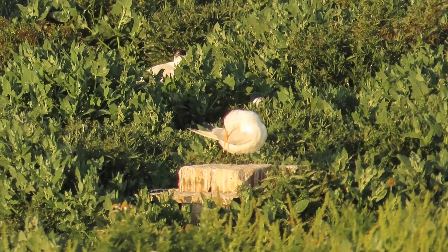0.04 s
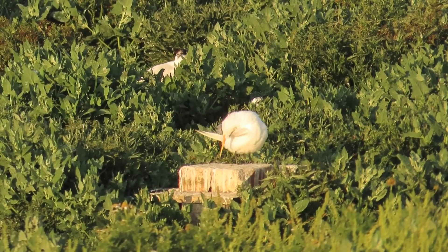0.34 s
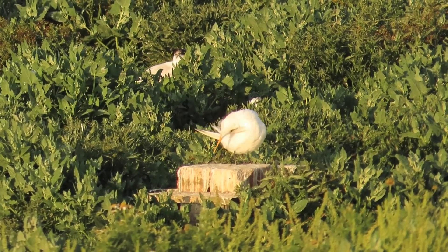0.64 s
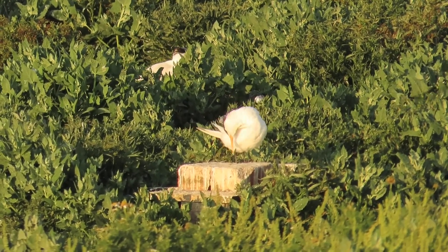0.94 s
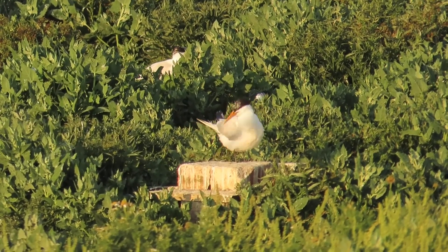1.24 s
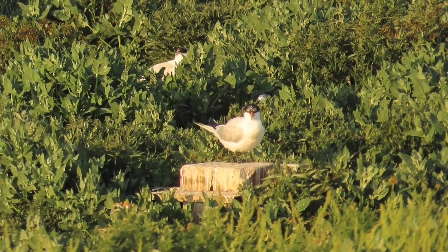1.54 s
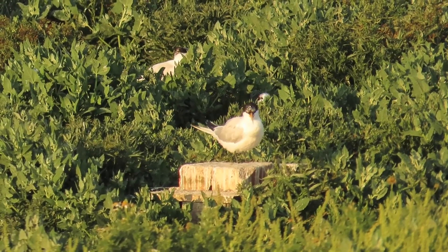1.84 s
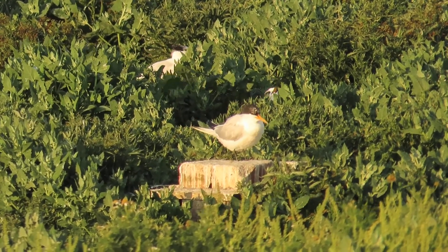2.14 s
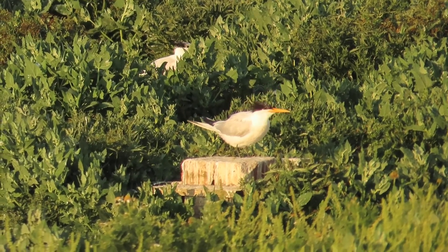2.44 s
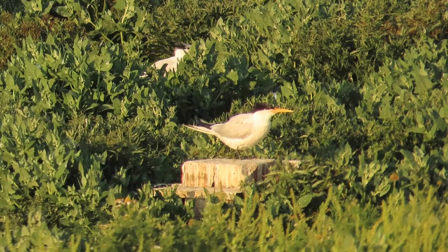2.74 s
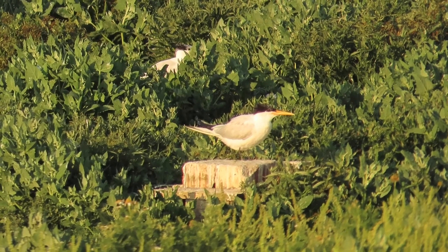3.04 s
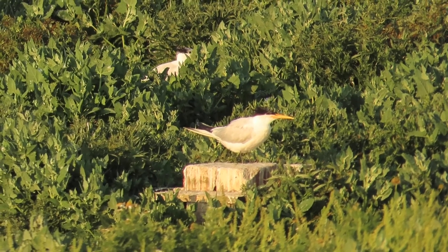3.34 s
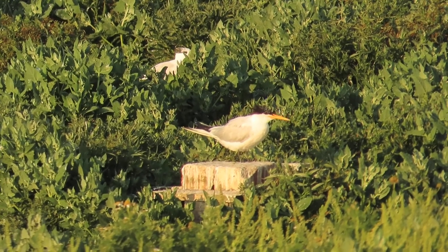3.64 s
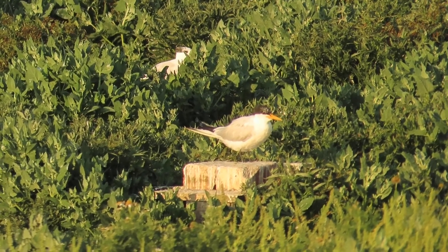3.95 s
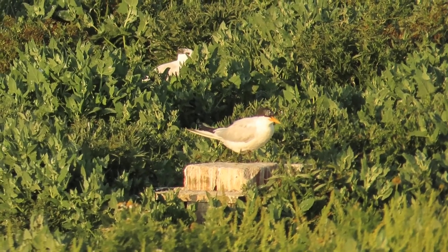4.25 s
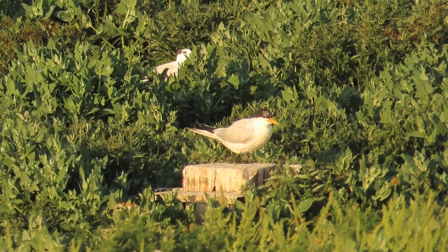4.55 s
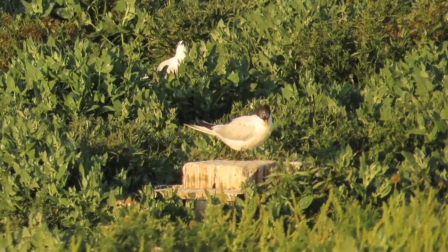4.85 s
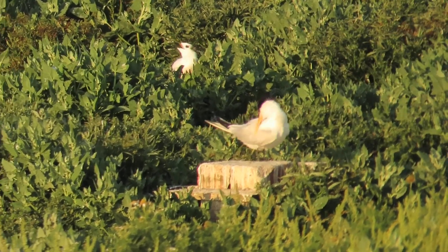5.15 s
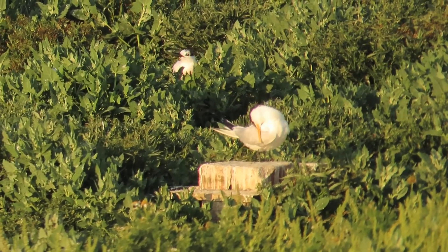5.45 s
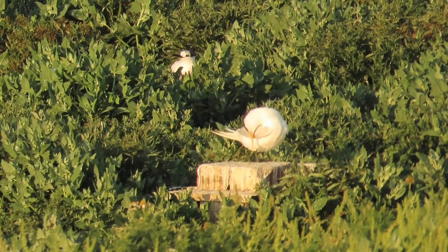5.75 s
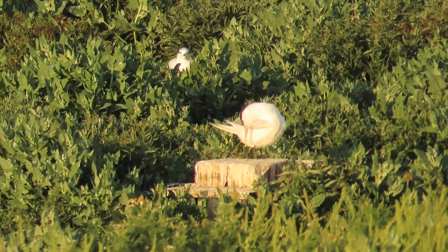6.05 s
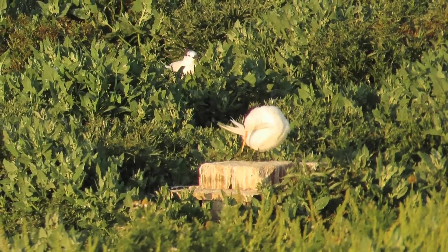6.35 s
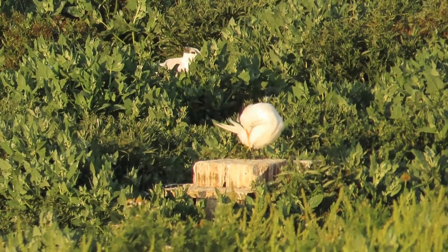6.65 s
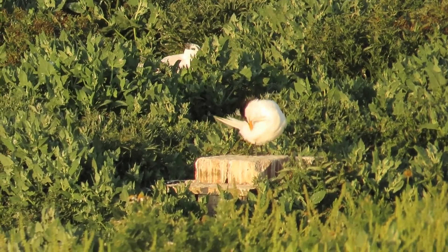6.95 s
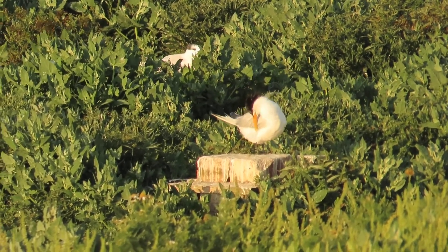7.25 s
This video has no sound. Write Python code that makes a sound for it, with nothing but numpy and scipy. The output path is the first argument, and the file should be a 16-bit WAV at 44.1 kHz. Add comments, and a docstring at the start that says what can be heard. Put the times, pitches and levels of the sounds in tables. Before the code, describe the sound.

Hundreds of seabirds call over one another in the open air, making a dense, high chatter that swells and sinks slightly. Rasping screeches, bending whistles and squeaky chips from closer terns poke through all along, joined from about halfway by several stronger, rattling cries. Light wind buffets the microphone at times with a low rumble, and there are a few faint knocks and ticks, mostly near the end.

```python
"""Tern colony on a breezy evening

Terns clamour in low shrubs. Each call is a whistle that bends in pitch and rasps when chopped into
quick pulses. Near birds stand out with grating "keer" calls, wavering wails, screeches and chips;
hundreds more overlap behind them and melt into a far wash of noise. Gusts rumble on the microphone,
and a few faint knocks and ticks sound close by."""
import sys
import numpy as np
from scipy import signal
from scipy.fft import rfft, irfft, next_fast_len
from scipy.io import wavfile
from scipy.ndimage import map_coordinates

SR = 44100
rng = np.random.default_rng(int(sys.argv[2]) if len(sys.argv) > 2 else 0)


def wav_out(sig):
    """Save sig, one row per channel (or a flat mono array), as 16-bit PCM at SR to the path in sys.argv[1]."""
    wavfile.write(sys.argv[1], SR, np.round(np.clip(np.atleast_2d(sig).T, -1, 1) * 32767).astype(np.int16))


N = 326781
TIME = np.arange(N) / SR

# "keer" calls: start of the clear hold/s, hold/s, f/Hz, level/dB, rattle before/s, rattle after/s
KEER_CALLS = [(3.999, 0.11, 2160, -21, .036, 0.028), (5.05, .12, 2143, -20, .064, 0.074),
              (6.112, 0.075, 2226, -18.5, 0.045, .013), (7.336, .15, 2203, -17, 0.071, .03)]
# thin wails: t/s, length/s, level/dB, rasp (0 clear, 1 harsh), then f/Hz at five even steps
WAIL_NOTES = [(.34, .17, -37, .15, 5570, 5610, 5640, 5680, 5650),
              (.525, 0.11, -25, .2, 3600, 3440, 3350, 3210, 2850),
              (.545, 0.089, -31, .3, 4650, 4920, 5080, 5050, 4850),
              (.775, .06, -30, .3, 5500, 5350, 5200, 5100, 5080),
              (.845, 0.099, -29.5, .1, 5150, 5380, 5260, 5380, 5200),
              (.905, 0.095, -20.5, .05, 2250, 2230, 2430, 2490, 2300),
              (1.13, .12, -27.5, .3, 2400, 2475, 2560, 2640, 2600),
              (1.595, .055, -23, .15, 2980, 2995, 2890, 2640, 2500),
              (1.655, .125, -26, .25, 2600, 2770, 2980, 3070, 2950),
              (1.69, .09, -38, .2, 5550, 5750, 5880, 5900, 5830),
              (1.96, 0.15, -21, 0.33, 2380, 2360, 2260, 2270, 2320),
              (2.13, .11, -20.5, .1, 2265, 2273, 2400, 2440, 2300),
              (2.34, 0.085, -24, 0.22, 2180, 2400, 2650, 2790, 2780),
              (2.55, .095, -26.5, .15, 2620, 2800, 2950, 3040, 2870),
              (2.74, .14, -32, .3, 2187, 2335, 2480, 2520, 2430),
              (2.765, .065, -40, .1, 5700, 5780, 5750, 5600, 5380),
              (2.875, 0.1, -32.5, 0.6, 5430, 5650, 5550, 5400, 5130),
              (2.985, 0.12, -31.5, .05, 5220, 5430, 5430, 5730, 5400),
              (3.385, .085, -36, .2, 5250, 5280, 5150, 5080, 4950),
              (3.54, .11, -27.5, .2, 2153, 2195, 2280, 2370, 2400),
              (3.92, .11, -26, 0.27, 2294, 2490, 2700, 2590, 2380),
              (4.195, .11, -28.5, .2, 2120, 2310, 2440, 2330, 2130),
              (4.595, .08, -25.5, .2, 2150, 2346, 2550, 2690, 2750),
              (5.3, 0.15, -28.5, 0.27, 2284, 2465, 2700, 2930, 3050),
              (5.49, 0.07, -35, .2, 4200, 4440, 4600, 4620, 4400),
              (5.52, .12, -32, .2, 3300, 3320, 3300, 3270, 3120),
              (5.53, .1, -25.5, .25, 2346, 2200, 2250, 2340, 2350),
              (5.59, .1, -35, .3, 4190, 4500, 4600, 4450, 4600),
              (5.7, .125, -38, .15, 5300, 5280, 5560, 5460, 5250),
              (6.2, 0.19, -26, .35, 2260, 2440, 2650, 2730, 2680),
              (6.68, 0.098, -22.5, 0.22, 2220, 2300, 2430, 2470, 2400)]
# drawn-out notes on one pitch: t/s, length/s, f/Hz, level/dB, rasp/0-1
SCREECH_NOTES = [(0.299, 0.07, 2950, -28, 1), (0.318, 0.21, 3670, -31, 0.7),
                 (0.473, .15, 2303, -24.5, 0.82), (.629, 0.13, 4930, -37, 0.66),
                 (1.006, 0.078, 5000, -31, .8), (1.19, 0.15, 4350, -30.5, .86),
                 (1.552, 0.17, 1836, -34, .98), (1.867, .15, 4650, -31.5, 0.95),
                 (2.13, 0.18, 1348, -33.5, 1), (2.186, 0.089, 3950, -28, 1), (2.196, 0.13, 6800, -40.5, 1),
                 (2.869, 0.15, 4250, -33, .9), (3.085, 0.16, 2133, -28, 0.6), (3.16, 0.11, 2500, -27, 0.77),
                 (3.243, 0.14, 4700, -33, .9), (3.452, .09, 4080, -31, 1), (4.38, .07, 6620, -41, .4),
                 (4.598, 0.13, 6970, -44, 0.9), (4.917, .08, 4360, -30, 0.95),
                 (5.157, 0.058, 4300, -25, .8), (6.442, .06, 4900, -30, 1), (6.455, .059, 2240, -23, .1),
                 (6.473, .15, 7150, -45, 1), (6.574, 0.042, 2250, -26, .7), (6.635, .15, 3870, -34, .9),
                 (6.793, 0.09, 2365, -25.5, 0.4), (7.15, .17, 2550, -27, .9), (2.02, 0.12, 2510, -27, 1),
                 (4.117, .09, 2053, -27, 0.64), (4.451, 0.093, 2344, -24.5, 0.74),
                 (4.859, .07, 2255, -27, .5), (6.084, .11, 2024, -30, 0.94), (7.185, .08, 5970, -40, 1)]
# notes that slide up: t/s, length/s, middle f/Hz, level/dB, rasp/0-1
RISING_NOTES = [(.767, 0.068, 2270, -25.5, .15), (2.98, 0.041, 2315, -26, 0.2),
                (3.0, .06, 2685, -25.5, 0.5), (3.68, 0.058, 2800, -24, .3), (4.39, .054, 2250, -23.5, 0.1),
                (6.34, 0.055, 3030, -25.5, .2), (6.618, 0.035, 2280, -22, 0.2)]
# notes that slide down: t/s, length/s, middle f/Hz, level/dB, rasp/0-1
FALLING_NOTES = [(0, 0.084, 2540, -24.5, 0), (2, .05, 5500, -33, .1), (1, 0.047, 3000, -27, 0.3),
                 (3, 0.046, 3300, -28, .1), (6, 0.046, 3200, -25.5, .2)]
# short arched chips: t/s, length/s, top f/Hz, level/dB, overtone boost/dB, rasp/0-1, droop/octaves
CHIP_NOTES = [(.848, .048, 5980, -34.5, 3, 0, .08), (0.952, .033, 3290, -28, -10, .2, .08),
              (.955, .045, 4970, -24, -17, .05, 0.049), (1.791, .055, 3920, -37, 20, .3, 0.065),
              (1.817, 0.063, 2610, -26, 16, .5, 0.07), (2.182, 0.057, 4900, -28, -5, .1, .04),
              (2.408, 0.033, 3220, -24.5, 13, .2, 0.072), (3.825, .057, 2950, -31.5, 16, .2, 0.042),
              (4.092, .08, 2920, -29, 6, .3, .1), (4.43, 0.035, 2985, -23, 16, .1, 0.053),
              (4.441, 0.042, 4850, -27, 0, .05, 0.099), (4.516, 0.074, 2896, -19.5, 9, 0.06, 0.03),
              (4.68, 0.044, 4400, -26.5, 1, .6, .08), (5.981, 0.027, 5380, -29.5, -2, .2, 0.056),
              (6.293, 0.065, 4580, -30.5, 10, .3, 0.078), (6.507, 0.06, 2443, -23.5, 7, 0.5, 0.09),
              (6.927, .035, 5000, -31, -3, .1, .06), (7.156, .04, 5460, -30.5, 9, 0.5, .074)]
# kinds of voice in the crowd, with their typical values:
# rate/(calls per s), f/Hz, pitch spread/octaves, length/s, level/dB, rasp/0-1, harmonics 1-4/dB
CROWD_VOICES = [(31.936, 2440, .1, .09, -37, .42, 5.5, -9.5, -29, -49),
                (26.02, 3000, .14, .08, -36.5, 0.32, 3, -15, -22.5, -46),
                (29.98, 3300, .14, .1, -35.5, .7, 0.5, -11.5, -26, -48),
                (33.95, 1380, .08, .12, -37, 0.836, -5, -0.5, 0, -17),
                (29.9, 4050, .1, .08, -38.5, 0.62, 0, -16.5, -51, -60),
                (13.97, 5250, .062, .06, -42, 0.46, 3.5, -21, -60, -60)]
# shape of the colony's swells, softened in clamour(): t/s, throaty/dB, middle/dB, shrill/dB
COLONY_SWELLS = [(0.0, -32, -21, -31), (0.1, -31, -26.5, -29), (0.93, -34.5, -23, -30.5),
                 (1.36, -32, -24.5, -31), (1.67, -30.5, -22, -28), (1.79, -31.5, -27, -32),
                 (1.88, -29, -24.5, -29.5), (2.06, -40, -28.5, -35), (2.21, -33.5, -26.5, -28),
                 (2.31, -35, -23.5, -33), (2.42, -32, -25, -32), (2.52, -32, -30, -31.5),
                 (2.74, -32.5, -24.5, -33), (2.97, -33, -23.5, -30.5), (4.27, -33, -24, -33.5),
                 (4.52, -31, -22.5, -28), (4.7, -31, -22.5, -30.5), (4.77, -34, -29, -38.5),
                 (4.87, -31.5, -25.5, -33), (4.99, -29.5, -23.5, -30), (5.21, -34.5, -23.5, -28.5),
                 (5.28, -34.5, -29, -35), (5.4, -37, -25, -31.5), (5.7, -33, -25.5, -33.5),
                 (5.88, -38.5, -25, -39), (6.27, -29, -25.5, -29.5), (6.54, -37.5, -29, -33),
                 (6.65, -28.5, -23.5, -29), (6.89, -35.5, -24, -36.5), (7.05, -34, -28, -36),
                 (7.23, -27, -22.5, -31), (7.41, -31.5, -25, -30)]
# tone colour of the far birds: f/Hz, level/dB
WASH_SPECTRUM = [(530, -22.5), (900, -14.5), (1310, -9), (1850, -7.5), (2180, -1), (2340, -2.5), (3740, -4),
                 (4210, -9), (4680, -11.5), (5390, -10), (6200, -20), (6980, -17), (10200, -36.5),
                 (11200, -30.5), (15000, -45.5)]
# knocks and ticks: t/s, level/dB, centre f/Hz, width/octaves, time to fade by 60 dB/s
KNOCK_BURSTS = [(1.137, -31, 285, 0.35, 0.075), (1.2, -41, 296, 0.3, .12), (3.816, -33, 600, 2, 0.079),
                (6.324, -29.5, 11500, 0.76, 0.021), (6.648, -25.5, 870, 0.6, 0.065),
                (7.007, -30, 850, 0.94, 0.11)]
# strength of the wind on the microphone: t/s, level/dB
GUST_LEVELS = [(0.0, -70), (0.39, -45), (0.87, -51.5), (0.93, -36), (1.28, -55), (1.57, -35.5), (2.04, -34),
               (2.1, -27.5), (2.15, -32), (2.6, -47), (2.81, -32), (2.86, -23.5), (2.96, -28.5),
               (3.03, -20), (3.1, -38), (3.3, -44.5), (4.08, -51), (4.29, -33.5), (4.34, -36), (4.77, -40),
               (4.93, -34.5), (5.06, -46.5), (5.6, -41.5), (6.09, -33), (6.15, -27.5), (6.25, -38.5),
               (6.54, -38), (6.62, -30.5), (6.87, -37.5), (7.14, -23.5), (7.31, -54), (7.37, -30),
               (7.41, -53)]
# rumble shared by the microphone's two openings (ports): f/Hz, level/dB
RUMBLE_SPECTRUM = [(12, -42), (20, -17), (43, 1), (92, -0.5), (167, -12.5), (246, -24.5), (330, -28),
                   (430, -69), (730, -120)]
# small swirls of wind that differ between the ports: f/Hz, level/dB
EDDY_SPECTRUM = [(12, -45), (20, -13), (38, -6), (114, -2), (155, -3), (420, -24), (506, -26), (600, -29),
                 (780, -62), (1320, -120)]
# open-air background: f/Hz, level/dB
AIR_SPECTRUM = [(15, -44), (25, -18), (70, -42), (157, -5.5), (425, -3.5), (498, -0.5), (575, -12.5),
                (1100, -7.5), (1430, -63), (2420, -120)]
# how alike left and right are in the wash and the air: f/Hz, likeness/0-1
STEREO_LIKENESS = [(150, .99), (300, 0.85), (600, 0.94), (1400, 1), (3000, 0.93), (6000, 1), (9000, 0.96),
                   (12000, 1)]

RASP_HZ = 92.26   # typical pulse rate of a rasping voice
PORT_LAG_S, CUTOFF_HZ = 2.7e-5, 15300   # the microphone's left-side delay and treble limit


def tern(length, pitches, harmonics_db, rasp, jitter, rasp_jitter, rasp_sweep, waver=0):
    """One note: a whistle on a bending pitch, chopped into a rattle of pulses when it rasps."""
    size = max(int(length * SR), 200)
    progress, rasp = np.linspace(0, 1, size), np.clip(rasp, 0, 1)
    pulse_hz = RASP_HZ * np.exp(0.0934 * rng.normal() + 0.053 * wander(41, size))
    pulse_phase = 2 * np.pi * (np.cumsum(pulse_hz) / SR + rng.random())
    curve = np.polyfit(np.linspace(0, 1, len(pitches)), pitches, len(pitches) - 1)
    # a harsh voice is less steady, and its pitch sweeps within each pulse
    shake = (jitter + rasp_jitter * rasp ** 2) * wander(696, size)
    sweep = rasp_sweep * rasp ** 2 * np.sin(pulse_phase)
    hz = np.polyval(curve, progress) * (1 + shake + sweep) * (1 + waver * wander(110.6, size))
    phase = 2 * np.pi * np.cumsum(hz) / SR
    tone = sum(from_db(db) * np.sin(k * phase)
               for k, db in enumerate(harmonics_db, 1) if k * pitches[1] < CUTOFF_HZ)
    pulses = rms_one(1 - rasp + 2 * rasp * (.5 + .5 * np.cos(pulse_phase)) ** 2)
    swell = np.abs(np.sin(np.pi * progress)) ** .4
    flutter = rms_one(from_db((2 + 4 * rasp) * wander(88.6, size)))
    return np.sqrt(2) * tone * pulses * swell * flutter


def overtones(pitch, rasp, bright_db=0):
    """Levels of harmonics 1-4: the upper three are weak in a shrill voice, stronger in a harsh one."""
    second_db = -18.5 + bright_db - 14.5 * np.log2(pitch / 2190) + 3 * rasp
    return [0, second_db, second_db - 8, second_db - 27]


def near_note(length, pitch, rasp, octaves_per_s=0, droop=0, bright_db=0):
    """A near bird's note: the pitch slides steadily and sags by `droop` octaves at both ends."""
    slide = octaves_per_s * length / 2
    pitches = pitch * 2 ** np.array([-slide - droop, 0, slide - droop])
    return tern(length, pitches, overtones(pitch, rasp, bright_db), rasp,
                jitter=.0018, rasp_jitter=0.018, rasp_sweep=0.026)


def keers(rattle_octaves=-0.11, rattle_db=-8.5, octaves_per_s=0.69):
    """A grating call: a low rattle climbs into a clear held note, then breaks into a sinking rattle."""
    out = np.zeros((2, N))
    for start, hold, pitch, db, lead, tail in KEER_CALLS:
        low = pitch * 2 ** rattle_octaves
        rise = from_db(rattle_db) * near_note(lead, low, rasp=1, octaves_per_s=octaves_per_s)
        held = near_note(hold, pitch, rasp=0.16, droop=0.032)
        fall = from_db(rattle_db) * near_note(tail, low, rasp=1, octaves_per_s=-octaves_per_s)
        add(out, start - lead, from_db(db) * placed(np.concatenate([rise, held, fall])))
    return out


def wails(fade_db=3.5):
    """Thin notes whose pitch bends up and down, wavering and fading as they go."""
    out = np.zeros((2, N))
    for start, length, db, rasp, *pitches in WAIL_NOTES:
        note = tern(length, pitches, overtones(np.mean(pitches), rasp), rasp,
                    jitter=0.0045, rasp_jitter=0.026, rasp_sweep=.04, waver=0.0093)
        fade = from_db(fade_db * np.linspace(.5, -.5, len(note)))
        add(out, start, from_db(db) * placed(note * fade))
    return out


def near_birds():
    """The keers, wails, screeches, sliding notes and chips that stand out of the crowd."""
    out = keers() + wails()
    for start, length, pitch, db, rasp in SCREECH_NOTES:
        add(out, start, from_db(db) * placed(near_note(length, pitch, rasp, droop=0.0273)))
    for notes, octaves_per_s in (RISING_NOTES, 2.24), (FALLING_NOTES, -1.51):
        for start, length, pitch, db, rasp in notes:
            note = near_note(length, pitch, rasp, octaves_per_s, droop=0.036)
            add(out, start, from_db(db) * placed(note))
    for start, length, pitch, db, bright_db, rasp, droop in CHIP_NOTES:
        note = near_note(length, pitch, rasp, droop=droop, bright_db=bright_db)
        add(out, start, from_db(db) * placed(note))
    return out


def squeaks(per_s=12, pitch_hz=5400, spread_octaves=0.11, length=0.0493, db=-41):
    """Thin arched squeaks from birds further off run together into a twitter."""
    out, count = np.zeros((2, N)), int(per_s * N / SR)
    for k, (late, high, long, slope, close) in enumerate(rng.uniform(-1, 1, (count, 5))):
        pitch = pitch_hz * 2 ** (spread_octaves * high)
        note = near_note(length * 2 ** (long / 2), pitch, rasp=0.41, octaves_per_s=slope, droop=0.0835)
        add(out, (k + late) / per_s, from_db(db + 0.5 * close) * placed(note))
    return out


def crowd(distance_db=1.5, glide=.06, arch=.06):
    """Birds further off call at random, each with its own pitch, slope and distance."""
    out = np.zeros((2, N))
    for per_s, pitch, spread, length, db, rasp, *harmonics_db in CROWD_VOICES:
        count = int(per_s * N / SR)
        starts = (np.arange(count) + rng.uniform(-.7, .7, count)) / per_s
        traits = np.clip(rng.standard_normal((count, 6)), -2, 1.6)
        for start, (high, slope, bend, long, close, harsh) in zip(starts, traits):
            # most notes rise to a crest and drop again
            shape = np.array([1 - arch - glide * slope, 1, 1 - arch * (1 + .5 * bend) + glide * slope])
            pitches = pitch * 2 ** (spread * high) * shape
            note = tern(length * np.exp(.25 * long), pitches, harmonics_db, rasp + 0.17 * harsh,
                        jitter=.002, rasp_jitter=0.0267, rasp_sweep=0.033)
            add(out, start, from_db(db + distance_db * close) * placed(note))
    return out


def placed(sound, spread_db=0.5, lag_spread_s=1.4e-5):
    """A bird's place left or right: one side is by chance a little louder, and one a little earlier."""
    size = next_fast_len(sound.shape[-1])
    hz, sides = np.arange(size // 2 + 1) * SR / size, np.array([[.5], [-.5]])
    louder, earlier = rng.standard_normal(2)
    balance = from_db(spread_db * louder * sides)
    time_shift = np.exp(2j * np.pi * hz * lag_spread_s * earlier * sides)
    return irfft(rfft(sound, size) * balance * time_shift, size)


def shrubs(calls, fade_s, echo_db):
    """Leaves and ground scatter a short, blurred echo behind every call."""
    t = np.arange(SR // 2) / SR
    shared, own = rng.standard_normal(len(t)), rng.standard_normal((2, len(t)))
    tail = (shared + 0.21 * own) * from_db(-60 * t / fade_s) * (t > .003)
    tail /= np.sqrt(np.sum(tail ** 2, axis=1, keepdims=True))
    return calls + from_db(echo_db) * signal.fftconvolve(calls, tail, axes=1)[:, :N]


def clamour(colony, throaty_hz=1950, shrill_hz=4400, depth=0.63, chance_db=.5):
    """The colony swells and sinks; its throaty, middle and shrill voices each in their own way."""
    throaty, below_shrill = [signal.sosfiltfilt(signal.butter(3, hz, fs=SR, output="sos"), colony)
                             for hz in (throaty_hz, shrill_hz)]
    bands = throaty, below_shrill - throaty, colony - below_shrill
    return sum(band * from_db(depth * (db - db.mean()) + chance_db * wander(9, N))
               for band, db in zip(bands, in_time(COLONY_SWELLS)))


def knocks():
    """Each knock or tick is a short burst of noise that dies away in its own range of pitch."""
    out, t = np.zeros(N), np.arange(SR // 4) / SR
    for start, db, hz, octaves, fade_s in KNOCK_BURSTS:
        edges = np.minimum([hz * 2 ** (-octaves / 2), hz * 2 ** (octaves / 2)], SR / 2 - 1)
        band = signal.butter(2, edges, "band", fs=SR, output="sos")
        burst = rms_one(signal.sosfilt(band, rng.standard_normal(len(t))))
        add(out, start, from_db(db - 60 * t / fade_s) * burst)
    return out


def wind(buffet_db=4, eddy_db=-6, eddy_growth=0.76):
    """Gusts press on both ports alike; hard ones also shed small swirls that differ between the two."""
    gust_db, = in_time(GUST_LEVELS)
    eddies = from_db(eddy_db + eddy_growth * (gust_db - gust_db.max())) * coloured_noise(EDDY_SPECTRUM)
    strength = from_db(gust_db + buffet_db * wander(25, N))
    return strength * (coloured_noise(RUMBLE_SPECTRUM) + eddies * [[1], [-1]])


def stereo_noise(spectrum):
    """A steady wash of noise with the given tone colour, partly alike on the left and right."""
    hz = np.arange(N // 2 + 1) * SR / N
    alike = np.clip(at_hz(STEREO_LIKENESS, hz), -1, 1)
    mid, side = rfft(rng.standard_normal((2, N)))
    pair = np.sqrt(1 + alike) * mid + np.sqrt(1 - alike) * side * [[1], [-1]]
    return rms_one(irfft(pair * from_db(at_hz(spectrum, hz)) * (hz > spectrum[0][0]), N))


def coloured_noise(spectrum):
    """One channel of noise with the given tone colour."""
    hz = np.arange(N // 2 + 1) * SR / N
    return rms_one(irfft(rfft(rng.standard_normal(N)) * from_db(at_hz(spectrum, hz)) * (hz > 15), N))


def from_db(db):
    """Turn decibels into a factor to multiply by."""
    return 10 ** (np.asarray(db) / 20)


def rms_one(x):
    """Scale a signal so that its average strength (rms) is 1."""
    return x / np.sqrt(np.mean(x ** 2) + 1e-20)


def in_time(rows):
    """Join a table's timed points with straight lines, one curve for each column."""
    times, *columns = np.transpose(rows)
    return [np.interp(TIME, times, column) for column in columns]


def at_hz(points, hz):
    """Read a table between its frequencies, with octaves evenly spaced."""
    frequencies, values = np.transpose(points)
    return np.interp(np.log(hz + 1e-6), np.log(frequencies), values)


def wander(rate, size):
    """A random drift of about 1 either way, turning `rate` times a second."""
    place = np.arange(size) * rate / SR + rng.random()
    return np.interp(place, np.arange(size // 20), rng.standard_normal(size // 20))


def add(track, start, sound):
    """Mix a sound in at its time, cut to the length of the track."""
    i = int(round(start * SR))
    lo, hi = max(i, 0), min(i + sound.shape[-1], N)
    if hi > lo:
        track[..., lo:hi] += sound[..., lo - i:hi - i]


def scene(wash_db=-27, air_db=-50):
    """Near birds, the crowd and the far wash over the air, the wind and the knocks."""
    wash = from_db(wash_db) * stereo_noise(WASH_SPECTRUM)
    background = from_db(air_db) * stereo_noise(AIR_SPECTRUM) + wind() + knocks()
    near = shrubs(near_birds() + squeaks(), fade_s=0.1, echo_db=-19)
    far = clamour(wash + shrubs(crowd(), fade_s=0.34, echo_db=-14))
    lean_right = from_db([[-.45], [.45]])
    return (near + far) * lean_right + background


def record(dry):
    """Sound reaches the left port a little later, and the highest treble is cut."""
    left = map_coordinates(dry[0], [np.arange(N) - PORT_LAG_S * SR], order=5, mode="nearest")
    treble_cut = signal.ellip(10, .1, 90, CUTOFF_HZ, fs=SR, output="sos")
    return signal.sosfilt(treble_cut, np.array([left, dry[1]]))


dry = scene()
out = record(dry)
wav_out(out)
```